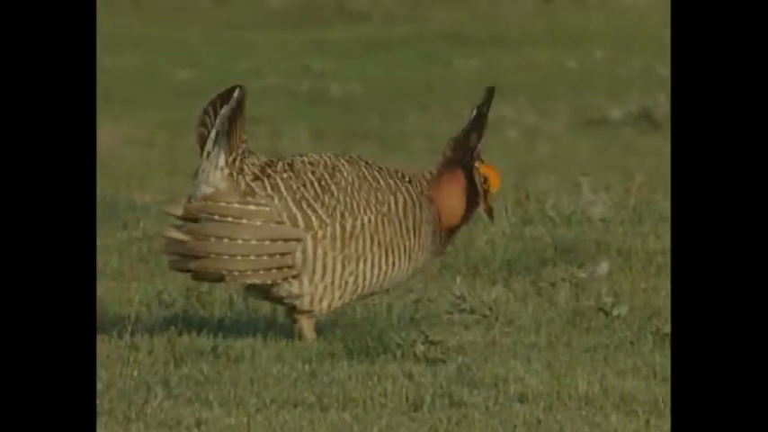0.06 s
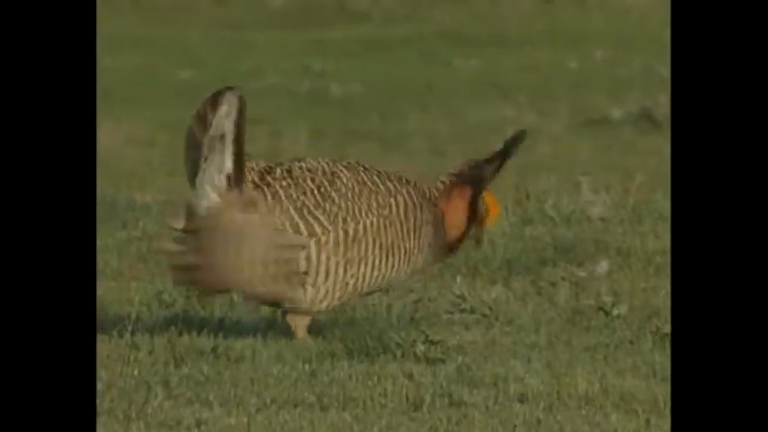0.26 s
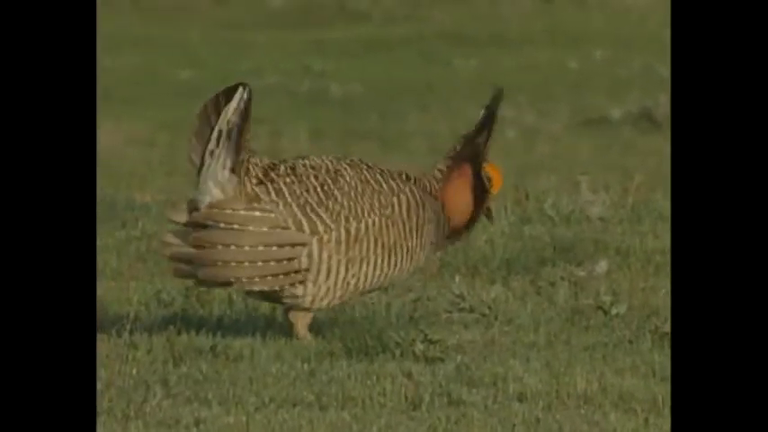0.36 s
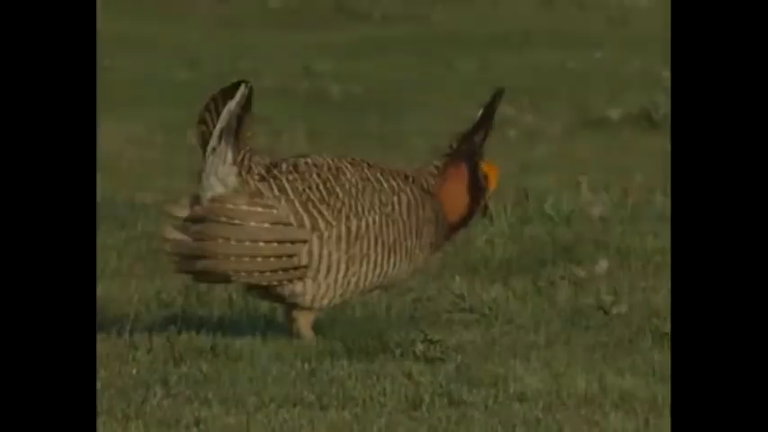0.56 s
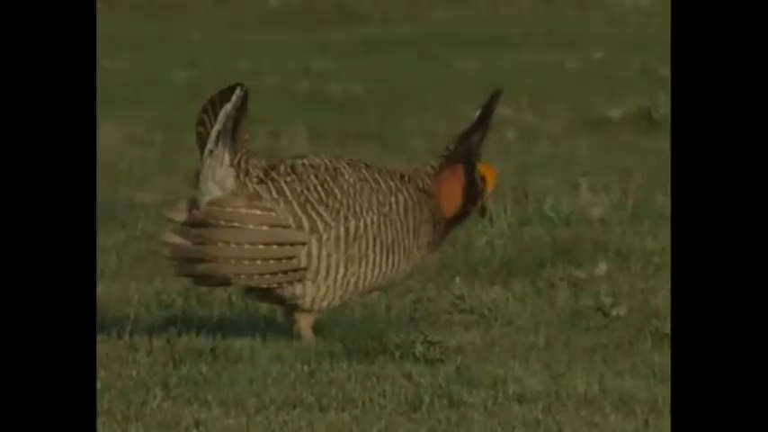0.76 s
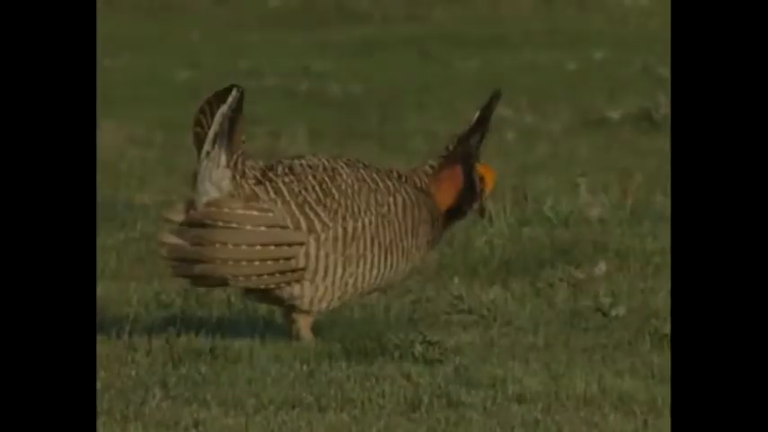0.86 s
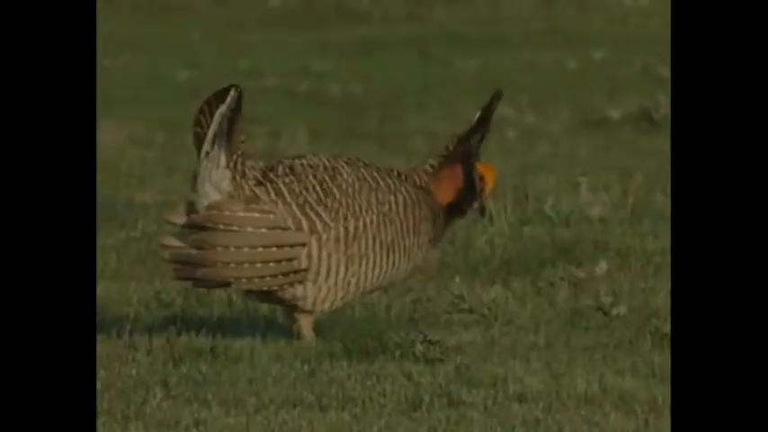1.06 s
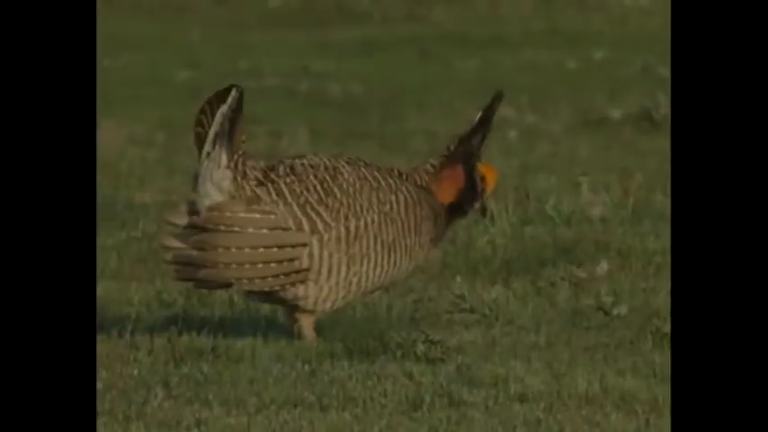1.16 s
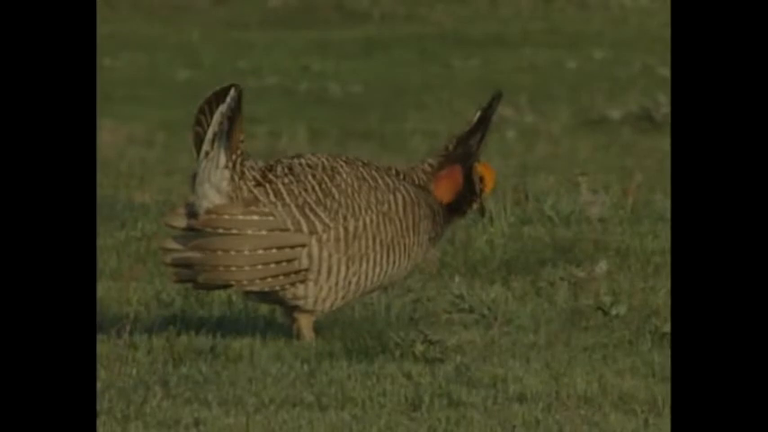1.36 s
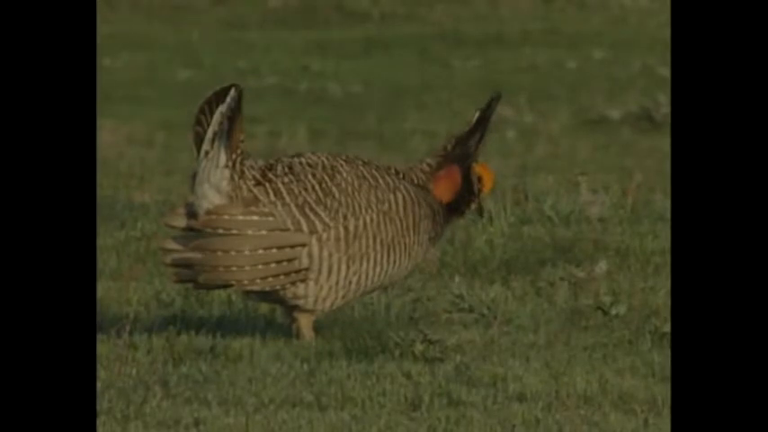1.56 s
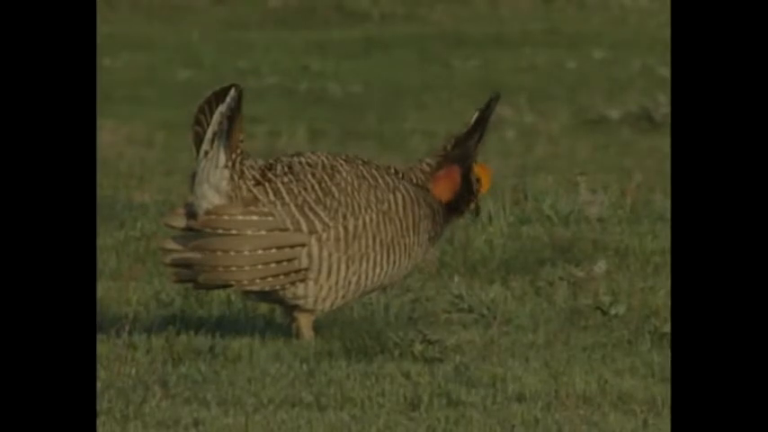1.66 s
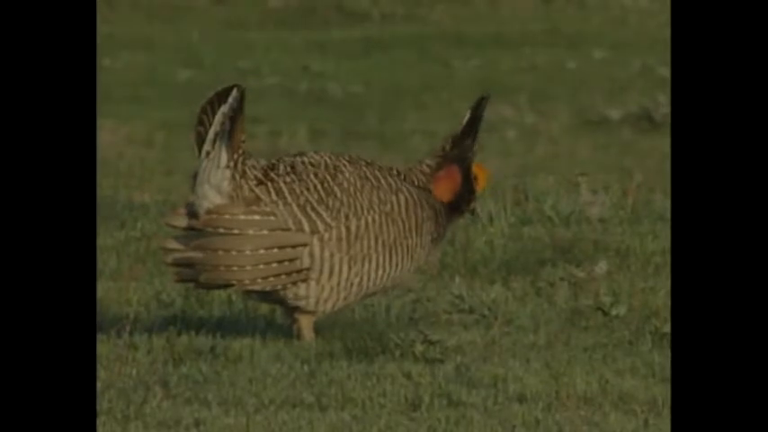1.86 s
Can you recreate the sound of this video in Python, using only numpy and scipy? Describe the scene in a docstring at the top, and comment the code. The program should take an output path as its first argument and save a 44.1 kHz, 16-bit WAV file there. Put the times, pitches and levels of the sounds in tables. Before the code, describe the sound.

A close prairie chicken gives one fast bubbling gobble ending in three hiccups, after a sharp reedy peep; then faint far coos, bird whistles, a second louder peep and distant yodels over low wind on open grassland.

```python
"""Prairie chickens on open grassland, over a low wind rumble, the coos of the farthest males and a faint hiss.
First a sharp reedy peep, an arched harmonic tone broken by a rattle, then two far yodels that break upward.
A near male then gobbles: two pure gliding voices of his syrinx cross and beat, with a growl in their midst,
and the last three syllables end in the same hiccup. Later far males coo and yodel, gliding sines and voices;
small birds whistle and chirp, steady or blurred sines, and a second peep cuts in."""
import sys
import numpy as np
from scipy import signal
from scipy.fft import rfft, irfft
from scipy.io import wavfile
from scipy.ndimage import uniform_filter1d

SR = 44100
rng = np.random.default_rng(int(sys.argv[2]) if len(sys.argv) > 2 else 0)


def master(y):
    """Save y as 16-bit WAV."""
    cut = np.clip(np.atleast_2d(y).T, -1, 1)
    pcm = np.round(cut * 32767)  # scale
    wavfile.write(sys.argv[1], SR, pcm.astype(np.int16))


N = 83790


def undb(db):
    """Logarithmic level: decibels become an amplitude ratio."""
    return 10 ** (np.asarray(db) / 20)


def times():
    """Sampling: the time of every sample, in seconds."""
    return np.arange(N) / SR


def walk(rate):
    """Low-pass randomness: smooth chance with a spread of 1, changing about rate times a second."""
    hold = max(int(SR / rate), 2)
    steps = rng.standard_normal(N)[np.arange(N) // hold]
    smooth = uniform_filter1d(uniform_filter1d(steps, hold), hold)
    return smooth / smooth.std()


def noise(points):
    """Spectral shaping: Gaussian noise of rms 1 filtered through points of (f/Hz, level/dB)."""
    hz, db = np.array(points).T
    f = np.maximum(np.arange(N // 2 + 1) * SR / N, 1)
    gain = undb(np.interp(np.log(f), np.log(hz), db))
    shaped = irfft(rfft(rng.standard_normal(N)) * gain, N)
    return shaped / shaped.std()


def turn(hz):
    """Phase is the integral of frequency: the running phase of an oscillator from a random start."""
    return 2 * np.pi * (np.cumsum(hz) / SR + rng.random())


def gate(start, end, edge):
    """Windowing: sine-squared edges avoid an abrupt onset and end."""
    t = times()
    return np.sin(np.pi / 2 * np.clip(np.minimum(t - start, end - t) / edge, 0, 1)) ** 2


OVERTONE_DB, OVERTONE_TOP_HZ = -8, 1070  # overtone gain and centre of the throat resonance
GOBBLE_JITTER, GOBBLE_ROUGH = 0.006, 0.11  # relative spread of pitch, and of level at the loudest


def voice(note, ease_s=0.0029, edge_s=0.0018, width_hz=130, overtone_limit_db=-42):
    """Source and resonance: one side of the syrinx glides, rougher when pushed; a throat resonance shapes
    the overtones, whose share shrinks when the tone is pushed well past the limit."""
    s, hz, db = np.array(note).T

    def smooth(values):
        return uniform_filter1d(np.interp(times(), s, values), max(int(ease_s * SR), 1))

    pitch = smooth(hz) * (1 + GOBBLE_JITTER * walk(250))
    phase = turn(pitch)
    size = undb(smooth(db))
    size = size * (1 + GOBBLE_ROUGH * size / size.max() * walk(450))
    overtones = 0
    for k in (2, 3):
        resonance = 1 / (1 + ((k * pitch - OVERTONE_TOP_HZ) / width_hz) ** 2) ** 2
        overtones = overtones + np.sin(k * phase) * resonance
    push = size / undb(overtone_limit_db)
    overtone_share = undb(OVERTONE_DB) * push / (1 + push ** 2) ** 2
    tone = size * (np.sin(phase) + overtone_share * overtones)
    return tone * gate(s[0] - edge_s, s[-1] + edge_s, 2 * edge_s)


# gliding notes of the gobble, overlapping where both voices sound; each note is rows of
# (t/s, f/Hz, level/dB before the overall gain)
GOBBLE_NOTES = [
    [(.199, 638, -57), (.209, 607, -41.5), (.222, 532, -34.5), (.229, 835, -38.5), (.25, 814, -51),
     (.28, 740.5, -47), (.308, 776, -48.5), (.325, 752, -48), (.33, 510, -39), (.339, 390.4, -43),
     (.368, 424, -44.5)],
    [(.236, 419, -59), (.254, 472, -47), (.273, 493, -37), (.281, 616, -31.5), (.288, 845, -34.5),
     (.296, 978, -47.5), (.304, 930, -58)],
    [(.312, 520, -51.5), (.335, 835, -39), (.345, 767, -32), (.356, 586, -27), (.365, 485, -33),
     (.373, 482, -39), (.389, 576, -29), (.401, 576, -41)],
    [(.381, 417.4, -49), (.39, 467, -36), (.398, 689, -37), (.416, 596, -41), (.436, 622, -49)],
    [(.392, 715, -46), (.403, 992, -42), (.421, 809, -34), (.43, 911, -51.5), (.446, 835, -44),
     (.466, 915, -44.5), (.48, 850, -52)],
    [(.408, 490.8, -52.5), (.435, 459, -45.5), (.443, 642, -30.5), (.453, 752, -40), (.47, 833, -41.5),
     (.488, 664, -37.5), (.503, 649, -48), (.537, 705, -52)],
    [(.497, 560.3, -61), (.511, 527, -36.5), (.524, 635, -28.5), (.538, 711, -30), (.544, 780, -45),
     (.549, 785, -40.5)],
    [(.598, 680, -55), (.69, 657.7, -52.5), (.733, 724, -51)],
    [(.61, 596, -61), (.66, 556.5, -41), (.681, 542, -54), (.701, 547.6, -34), (.71, 572, -40),
     (.716, 717, -35), (.726, 845, -61)],
    [(.816, 730, -65), (.826, 551, -63), (.852, 529, -48), (.873, 521, -47), (.887, 526, -58),
     (.912, 541, -39.5), (.922, 641, -40), (.931, 700, -81)],
]
# the hiccup: one voice plunges while the other drops in from above
# (t/s from the plunge before stretching, f/Hz, level/dB before each hiccup's offset)
PLUNGE_GLIDE = [(-.022, 700, -55), (-.013, 790, -40.5), (0, 692, -30.5), (.004, 459, -44),
                (.013, 380, -50.5), (.036, 320, -59)]
LANDING_GLIDE = [(-.001, 1049, -61), (.005, 813, -44), (.015, 730, -41.5), (0.027, 710, -42),
                 (.033, 666, -59)]
# hiccups (t/s of the plunge, level offset/dB, length ratio)
HICCUP_TIMES = [(0.575, 1, 0.79), (.745, 0, 1), (.955, -0.5, 0.82)]
GOBBLE_DB = -1.12  # overall gain
# the growl: span in s, mean flutter rate in Hz, depth as a fraction, and band in Hz
GROWL_S, GROWL_HZ, GROWL_DEPTH, GROWL_BAND_HZ = (.385, 0.454), 208.5, .45, (450, 900)


def gobble():
    """Beating and amplitude modulation: crossing glides, an uneven growl that the throat keeps low, hiccups."""
    out = sum(voice(note) for note in GOBBLE_NOTES)
    flutter_hz = GROWL_HZ * (1 + 0.241 * walk(GROWL_HZ))
    flutter = GROWL_DEPTH * gate(*GROWL_S, .015) * np.sin(turn(flutter_hz))
    throat = signal.butter(4, GROWL_BAND_HZ, "bandpass", fs=SR, output="sos")
    out = out + signal.sosfiltfilt(throat, out * flutter)
    for start, db, length in HICCUP_TIMES:
        for shape in (PLUNGE_GLIDE, LANDING_GLIDE):
            out = out + voice([(start + length * s, hz, db + d) for s, hz, d in shape])
    return out * undb(GOBBLE_DB)


# peeps (start t/s, length t/s, reference pitch f/Hz, reference level/dB)
PEEP_NOTES = [(.0065, 0.0555, 1884, -51), (1.4076, .0548, 1858, -44)]
# arch of a peep (share of its length, pitch ratio, level offset/dB, roughness 0-1)
PEEP_ARCH = [(0, .85, -14.5, 0.4), (.08, .865, -15.5, .15), (.17, .957, -7, 0.05), (.31, .998, -1.5, .1),
             (.39, 1.008, 2, .95), (.62, .997, 0, 0.28), (.86, .96, -3.5, 0.65), (1, .83, -20, 0.9)]
# harmonics of a peep, from the first upward (relative level/dB)
REED_HARMONICS = [-23, -1, -2, -12, -34, -26]
RATTLE_HZ, RATTLE_SWING = 336, 0.36  # mean rate, and phase swing in rad at full roughness
RASP_DB = -25  # spread of the random level at full roughness


def peeps(flutter=0.0316):
    """Joint amplitude and phase modulation: arched reedy notes break into a rasping rattle of brief dropouts."""
    share, ratio, level, roughness = np.array(PEEP_ARCH).T
    out = 0
    for start, length, hz, db in PEEP_NOTES:
        def along(values):
            return np.interp(times(), start + length * share, values)

        rough = along(roughness)
        rattle = turn(RATTLE_HZ * (1 + 0.33 * walk(250)))
        pitch = hz * along(ratio) * (1 + flutter * rough * walk(2500))
        phase = turn(pitch) - RATTLE_SWING * rough * np.sin(rattle)
        dropouts = 1 - rough * ((1 + np.cos(rattle)) / 2) ** 3
        size = undb(db + along(level)) * dropouts
        rasp = 1 + rough * undb(RASP_DB) * walk(3400)
        reed = sum(undb(d) * np.sin((k + 1) * phase) for k, d in enumerate(REED_HARMONICS))
        out = out + size * rasp * gate(start, start + length, 0.00096) * reed
    return out


# a far male's yodel: a low scoop that breaks upward and fades
# (t/s from the break, f/Hz before the pitch ratio, level offset/dB)
YODEL_GLIDE = [(-.032, 465, -10), (-.012, 501, -5.5), (0, 622, 2.5), (0.011, 755, -5.5), (.048, 742, -13)]
# yodels (t/s of the break, reference level/dB, pitch ratio)
YODEL_TIMES = [(.036, -63, 1.056), (0.147, -61, 1.07), (1.386, -58, 0.85), (1.438, -62.5, .96),
               (1.503, -59.5, 1)]


def yodels():
    """Transposition: far males share one upward break, each time a little higher or lower."""
    out = 0
    for start, db, ratio in YODEL_TIMES:
        out = out + voice([(start + s, ratio * hz, db + d) for s, hz, d in YODEL_GLIDE])
    return out


# three tables of (start t/s, length t/s, start f/Hz, end f/Hz, level/dB):
# far males cooing
COO_NOTES = [(1.04, 0.051, 735, 764, -68), (1.272, 0.027, 561, 500, -61), (1.29, 0.074, 411, 535, -55),
             (1.545, 0.098, 621, 422, -64), (1.76, 0.066, 573.4, 516, -67), (1.835, 0.058, 785, 745, -66.5),
             (1.85, 0.054, 455.5, 387, -64)]
# small far birds whistling
WHISTLE_NOTES = [(.90, 0.11, 2735, 2630, -72.5), (1.065, 0.2, 3400, 3240, -72.5),
                 (1.34, 0.087, 2070, 2026, -68.5), (1.84, 0.061, 1796, 1730, -65)]
# hoarse, blurred chirps of small birds
CHIRP_NOTES = [(.215, .045, 5020, 5020, -74), (1.54, 0.0455, 3270, 2735, -76)]
COO_WAVER, WHISTLE_WAVER, CHIRP_WAVER = 0.0242, 0.0036, .035  # relative spread of pitch
CHIRP_WAVER_PER_S = 600
FAR_EDGE = 0.3  # fade, as a share of the length


def far_calls(table, waver, rate=90):
    """Frequency modulation: soft distant glides waver, and blur when they waver fast."""
    out = 0
    for start, length, hz0, hz1, db in table:
        glide = np.interp(times(), [start, start + length], [hz0, hz1])
        pitch = glide * (1 + waver * walk(rate))
        out = out + undb(db) * gate(start, start + length, FAR_EDGE * length) * np.sin(turn(pitch))
    return out


CHORUS_HZ, CHORUS_DB = 486, -83.5  # middle pitch and level of each voice
CHORUS_GLIDE, CHORUS_TURNS_PER_S = 0.2, 22  # spread of log pitch, and rate of wandering


def chorus(count=2):
    """Random modulation: the farthest males' faint coos wander in pitch, come and go."""
    out = 0
    for _ in range(count):
        size = undb(CHORUS_DB + 3.2 * walk(CHORUS_TURNS_PER_S))
        pitch = CHORUS_HZ * np.exp(CHORUS_GLIDE * walk(CHORUS_TURNS_PER_S))
        out = out + size * np.sin(turn(pitch))
    return out


GRASS_T60_S = 0.12  # time for the echo to decay by 60 dB


def scatter(x, db):
    """Diffuse reflection: open ground returns a short, exponentially decaying noise echo."""
    t = times()[:SR // 2]
    tail = rng.standard_normal(len(t)) * np.exp(-np.log(1000) * t / GRASS_T60_S)
    return x + undb(db) * signal.fftconvolve(x, tail / np.linalg.norm(tail))[:N]


# spectrum of the wind rumble (f/Hz, relative spectral level/dB)
WIND_SPECTRUM = [(12, -10.5), (30, -2), (108, 2), (128, -9), (145, -21), (200, -100)]
# swell of the gusts (t/s, level/dB)
GUST_LEVEL = [(0, -56.5), (0.201, -56.5), (.27, -48.5), (.65, -50), (.72, -54.5), (.93, -54.5),
              (1.2, -51.5), (1.27, -59), (1.501, -52), (1.9, -57.5)]


def wind():
    """Turbulence as shaped noise: a low rumble swells with the gusts."""
    s, db = np.array(GUST_LEVEL).T
    return noise(WIND_SPECTRUM) * undb(np.interp(times(), s, db))


# spectrum of the steady air and hiss (f/Hz, relative spectral level/dB)
AIR_SPECTRUM = [(155, -5), (190, 0.5), (255, 1.5), (330, -6), (500, -9.5), (1200, -19), (3000, -23.5),
                (12500, -24.5)]
AIR_DB = -65.5


def air():
    """Stationary noise: steady air and hiss, common to both channels."""
    return undb(AIR_DB) * noise(AIR_SPECTRUM)


# spectrum of the hiss that differs between left and right (f/Hz, relative spectral level/dB)
HISS_SIDE_SPECTRUM = [(150, -7), (12500, 4)]
HISS_SIDE_DB = -87.5


def hiss_side():
    """Decorrelation: noise of opposite sign in left and right adds a faint hiss that differs between the
    channels."""
    return undb(HISS_SIDE_DB) * noise(HISS_SIDE_SPECTRUM)


GRASS_DB, FAR_ECHO_DB = -15.5, -13  # echo gain for the near male and for the far flock


def scene():
    """Superposition: birds and wind in the centre; grass scatters the low calls but swallows the high ones."""
    near = scatter(gobble(), GRASS_DB) + peeps()
    flock = scatter(yodels() + far_calls(COO_NOTES, COO_WAVER) + chorus(), FAR_ECHO_DB)
    whistles = far_calls(WHISTLE_NOTES, WHISTLE_WAVER)
    chirps = far_calls(CHIRP_NOTES, CHIRP_WAVER, CHIRP_WAVER_PER_S)
    mid = near + flock + whistles + chirps + wind() + air()
    side = hiss_side()
    return np.array([mid + side, mid - side])


TOP_HZ = 12450


def record(dry):
    """Band limitation: a steep elliptic low-pass removes the treble above its edge."""
    low_pass = signal.ellip(10, .1, 60, TOP_HZ, fs=SR, output="sos")
    return signal.sosfilt(low_pass, dry)


dry = scene()
out = record(dry)
master(out)
```